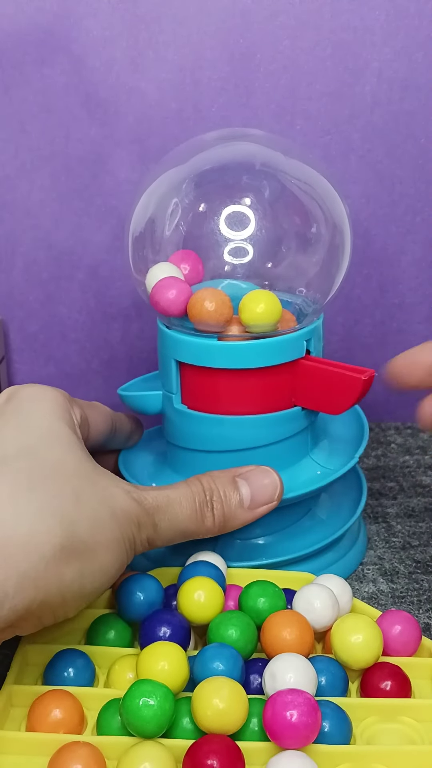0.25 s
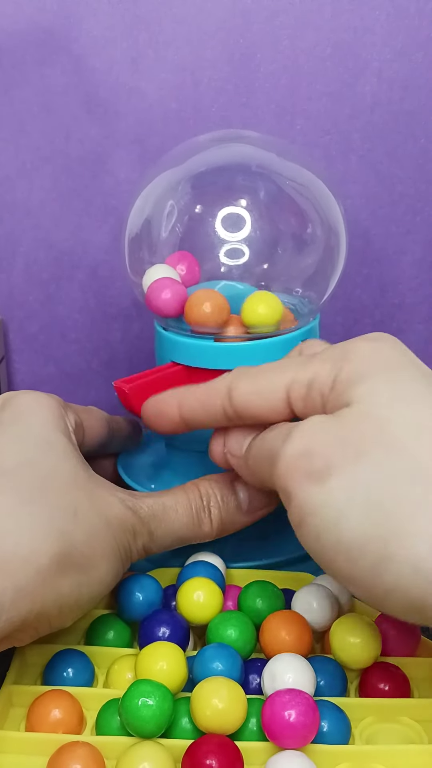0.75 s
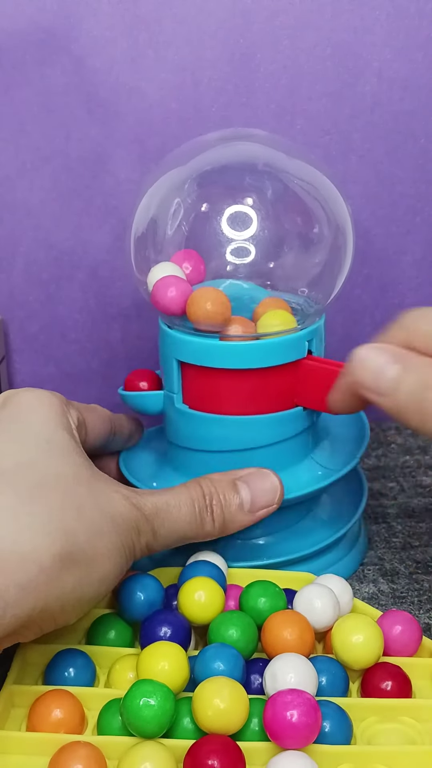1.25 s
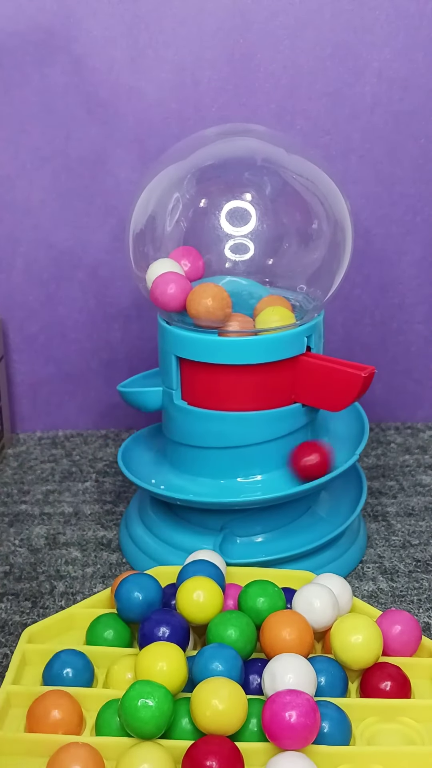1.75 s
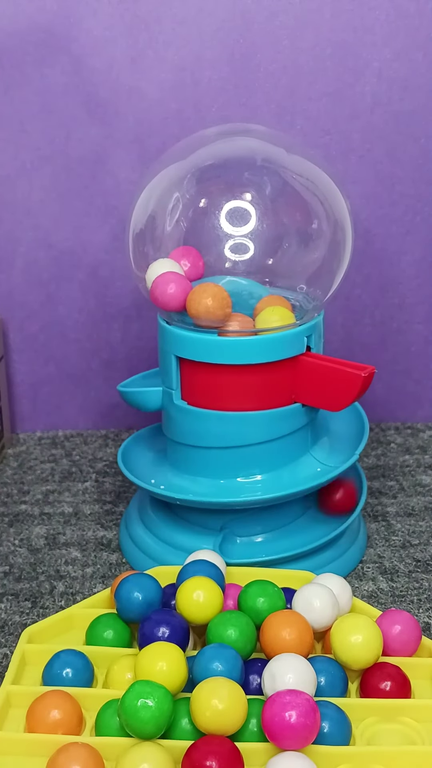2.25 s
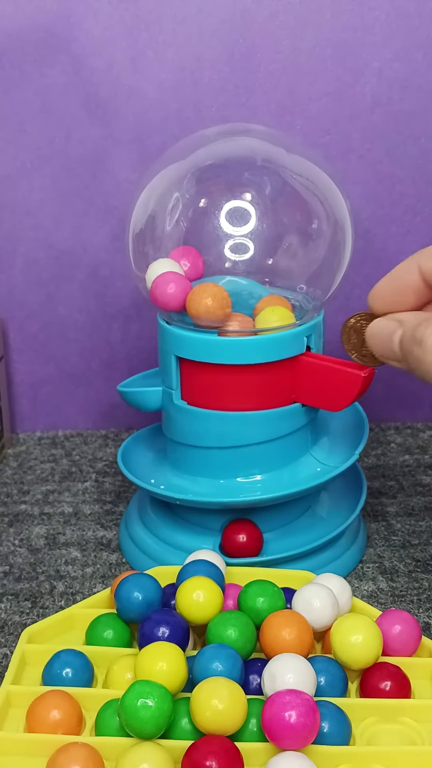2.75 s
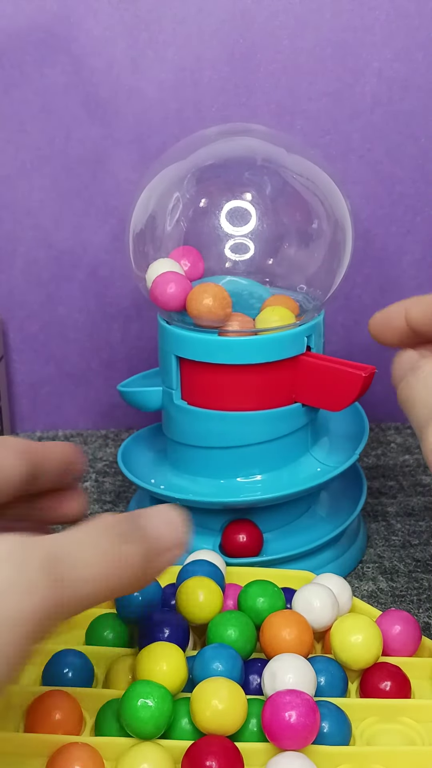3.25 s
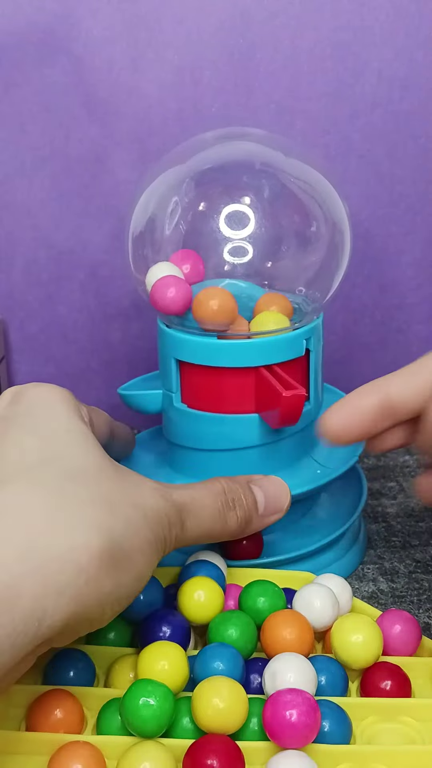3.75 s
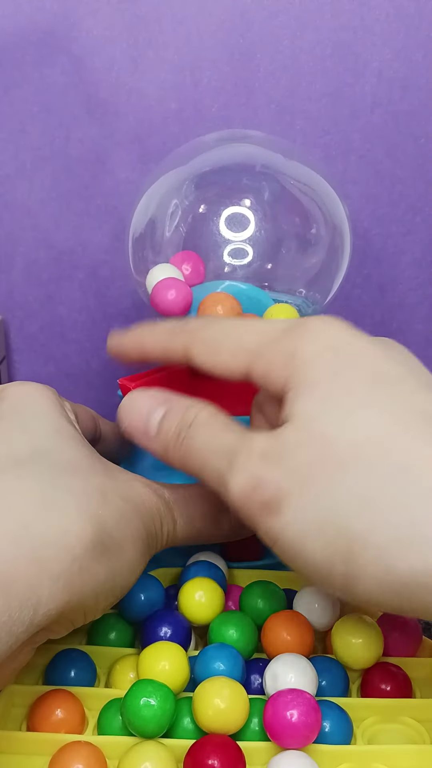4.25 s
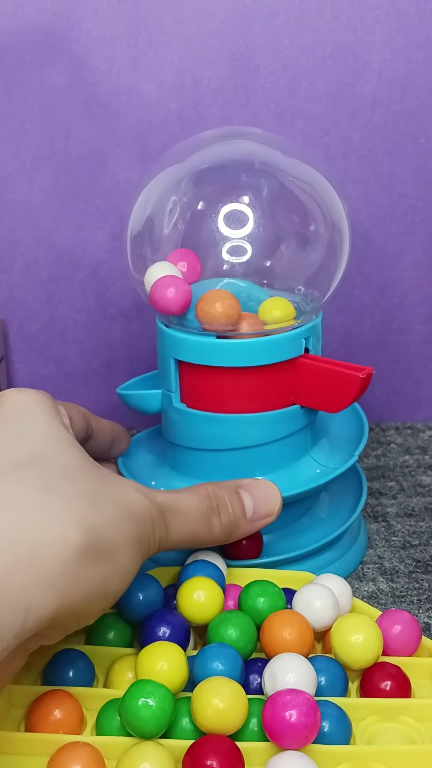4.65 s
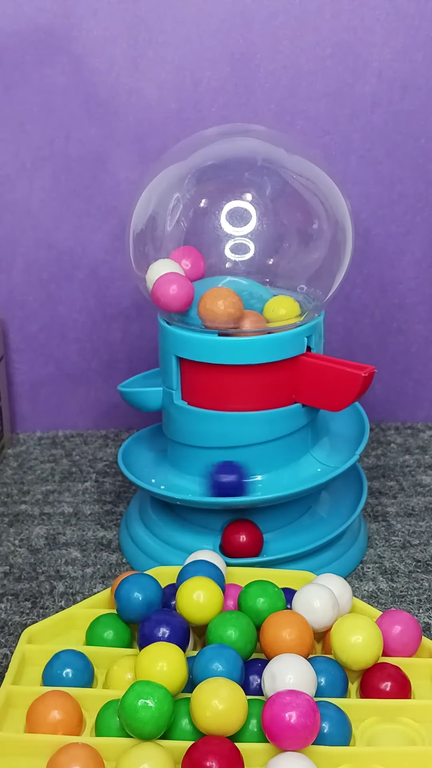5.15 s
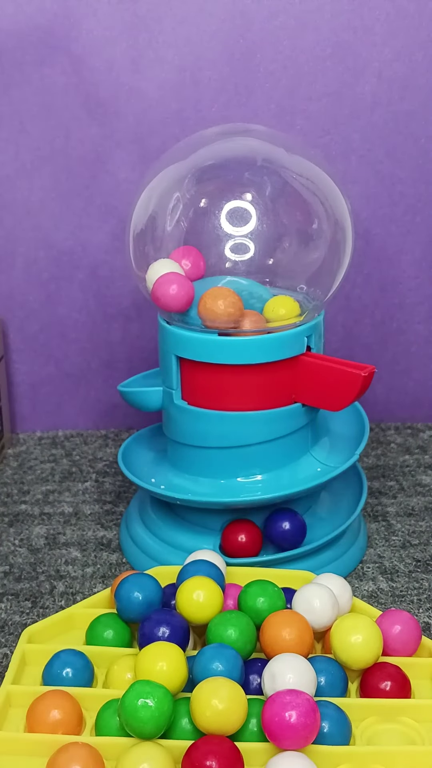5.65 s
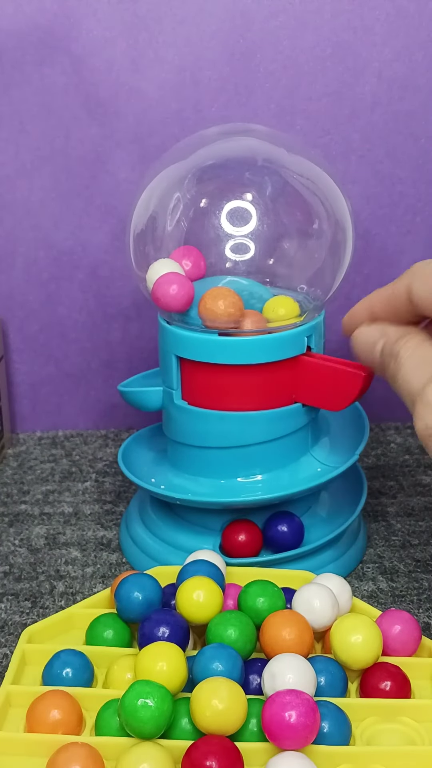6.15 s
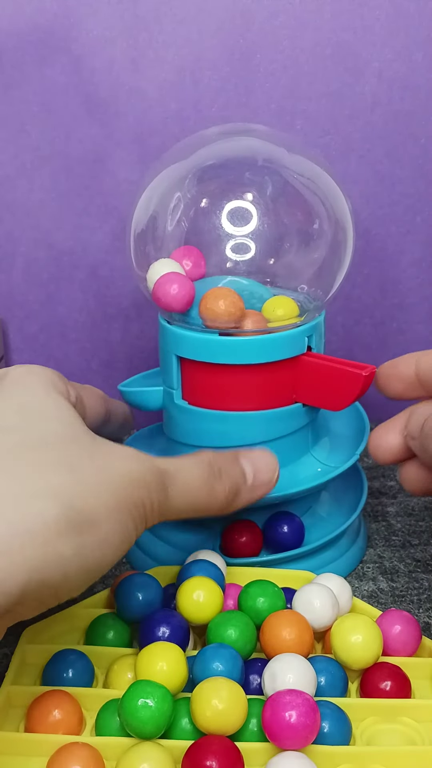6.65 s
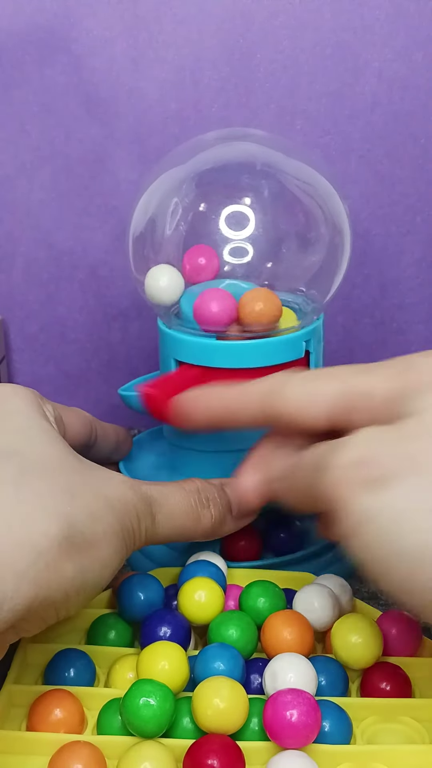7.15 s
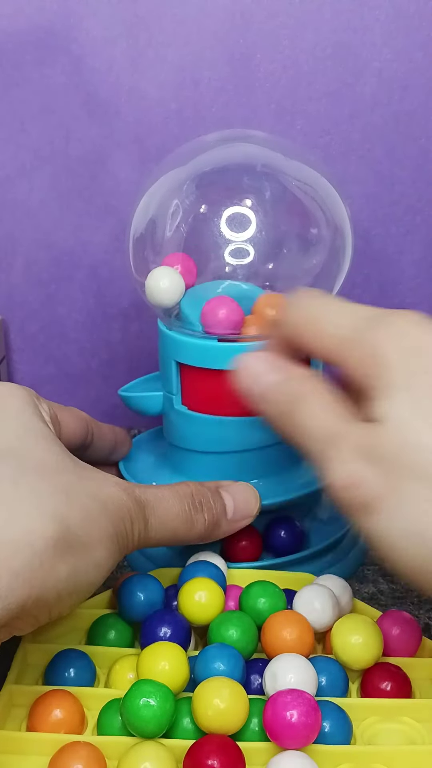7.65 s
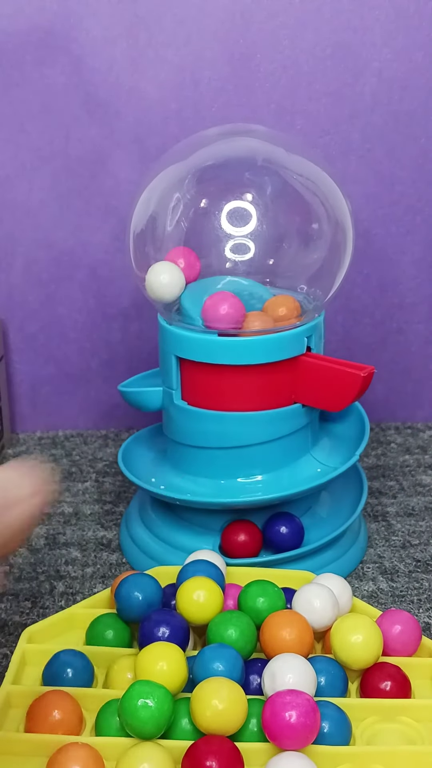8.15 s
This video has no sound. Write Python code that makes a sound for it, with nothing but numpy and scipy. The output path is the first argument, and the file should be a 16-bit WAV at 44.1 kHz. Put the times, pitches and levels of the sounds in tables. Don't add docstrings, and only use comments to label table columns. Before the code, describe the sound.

Three rounds of a plastic ball machine, heard closely in stereo: dry coin clicks, a hollow scraping lever swing with loud snapping stops and loose inner clatter, then a light ball hopping and rolling in uneven laps down a plastic ramp. The first two balls end with bright knocks; the third is still rolling at the end. The room is quiet, with short reflections, soft hiss and slight low bumps through the table.

```python
import sys
import numpy as np
from scipy import signal
from scipy.fft import rfft, irfft, next_fast_len
from scipy.io import wavfile
from scipy.ndimage import uniform_filter1d

SR = 44100
rng = np.random.default_rng(int(sys.argv[2]) if len(sys.argv) > 2 else 0)


def natural_amplitude(level_db):
    exponent = np.asarray(level_db, float) / 20
    return 10 ** exponent


def log_audio(samples):
    frames = np.atleast_2d(samples).T
    limited = np.clip(frames, -1, 1)
    pcm = np.round(limited * 32767).astype(np.int16)
    wavfile.write(sys.argv[1], SR, pcm)


N = 370881
T = np.arange(5000) / SR
LEAD = 110
SPOT_HZ = np.geomspace(1300, 4500, 10)


def evened(x):
    return x / np.sqrt(np.mean(x ** 2) + 1e-20)


def read(points, hz):
    f, value = np.transpose(points)
    return np.interp(np.log(hz + 1), np.log(f + 1), value)


def add(mix, s, sound):
    part = mix[:, round(s * SR):][:, :sound.shape[1]]
    part += sound[:, :part.shape[1]]


def coloured(x, points, share=1):
    n = x.shape[-1]
    size = next_fast_len(n)
    gain = natural_amplitude(share * read(points, np.fft.rfftfreq(size, 1 / SR)))
    return irfft(rfft(x, size) * gain, size)[..., :n]


# pitch_hz [Hz], level_db [dB per Hz]
ROOM_TONE = [(30, -14.5), (300, -31), (510, -29), (900, -39.5), (3200, -34), (6000, -41.5), (11000, -34.5),
             (15500, -43.5)]


def air():
    a, b, waver = rng.standard_normal((3, N))
    hum_db = -76.5 + 3.0 * evened(uniform_filter1d(waver, 2500))
    hum = natural_amplitude(hum_db) * np.sin(2 * np.pi * 63 * np.arange(N) / SR)
    hiss = evened(coloured(np.array([a, .5 * a + 1.9 * b]), ROOM_TONE))
    return natural_amplitude(-73) * hiss + hum


# pitch_hz [Hz], t60_s [s]
ROOM_DECAY = [(300, 0.22), (1000, 0.2), (3000, 0.15), (8000, 0.21), (15000, 0.02)]


def echo(x):
    taps = np.zeros((2, 16000))
    at = np.arange(300, 15960, 20) + rng.integers(0, 20, (2, 783))
    np.put_along_axis(taps, at, rng.choice([-1., 1.], at.shape), 1)
    hz, t, z = signal.stft(taps, SR, nperseg=256)
    same = np.exp(-(hz[:, None] / 800) ** 2)
    z[1] = same * z[0] + np.sqrt(1 - same ** 2) * z[1]
    decay = natural_amplitude(-60 * t / read(ROOM_DECAY, hz)[:, None])
    tail = signal.istft(z * decay, SR, nperseg=256)[1]
    return signal.oaconvolve(x[None], tail / np.linalg.norm(tail[0]), axes=1)[:, :N]


def room(x):
    turn = 2 * np.pi * 7 * np.arange(N) / SR
    mono = x.mean(0) * np.sqrt(2 / 3)
    return sum(echo(mono * np.cos(turn + k * np.pi / 3)) for k in range(3))


# start_s [s], hardest_s [s], end_s [s], pressure_db [dB], hollow_db [dB]
STROKES = [
    (0.618, 0.786, 1.03, -35.5, -14.5),
    (1.148, 1.217, 1.35, -38, -2.5),
    (3.628, 3.714, 3.82, -37, -4),
    (3.906, 4.132, 4.29, -31, -12.5),
    (4.408, 4.43, 4.52, -38, -6),
    (6.007, 6.033, 6.13, -62, -4.5),
    (6.718, 6.94, 7.02, -45, -0.5),
    (7.054, 7.308, 7.34, -41, -4.5),
    (7.411, 7.423, 7.85, -31, -12),
]


def stroke(start, top, end, db, hollow_db):
    swell = ((start, db - 14), (top, db), (end, db - 21))
    return [(s, d, d + hollow_db, d - 7) for s, d in swell]


# start_s [s], end_s [s], first_hollow_pass_s [s], level_db [dB], speed_gain [dB per s]
DESCENTS = [
    (1.349, 2.459, 1.58, -60, 14.5),
    (2.501, 2.734, 2.62, -84.5, -13),
    (4.522, 5.762, 4.3, -56, 10),
    (7.85, 8.412, 7.56, -56.5, 6),
]


def descent(start, end, passes, db, db_per_s):
    lap_s, edge = .6, 2.6
    near = np.array([-3, 1.5, -12, 1900])
    far = np.array([0.5, -12, -6, 3100])
    s = np.linspace(start, end, 40)[:, None]
    away = .5 - .5 * np.tanh(edge * np.cos(2 * np.pi * (s - passes) / lap_s))
    lap = near + away * (far - near)
    speed_db = db_per_s * (s - start) * [1, .35, 1]
    return np.column_stack([s, lap[:, :3] + db + speed_db, lap[:, 3]])


# pitch_hz [Hz], level_db [dB per Hz]
TABLE_RUMBLE = [(40, -13.5), (70, -3.5), (155, 1), (230, -9.5), (400, -40.5)]


def handling():
    t = np.arange(N) / SR
    pressure = np.zeros(N)
    for shape, rows, gain_db in ((stroke, STROKES, 0), (descent, DESCENTS, -7.0)):
        for row in rows:
            s, db = np.transpose(shape(*row))[:2]
            pressure += natural_amplitude(np.interp(t, s, 0.62 * db + gain_db, -200, -200))
    rumble, lumps = rng.standard_normal((2, N))
    lumps_db = -39 + 3.3 * evened(uniform_filter1d(lumps, 1200))
    return evened(coloured(rumble, TABLE_RUMBLE)) * natural_amplitude(lumps_db) * uniform_filter1d(pressure, 600)


def ring(modes, spread_db, detune, twist):
    hz, db, t60 = np.transpose(modes)[:, :, None]
    spot, tune, left, right = rng.standard_normal((4, len(hz), 1))
    t = T[:round(t60.max() * SR) + 200]
    body = natural_amplitude(db + spread_db * spot - 60 * t / t60)
    turn = 2 * np.pi * hz * (1 + detune * tune) * t
    pair = np.array([(body * np.sin(turn + twist * port)).sum(0) for port in (left, right)])
    padded = np.pad(pair, ((0, 0), (0, len(T) - len(t))))
    return padded / np.sqrt(np.mean(pair[:, :200] ** 2))


# start_s [s], level_db [dB], pitch_hz [Hz], t60_s [s]
COINS = [(0.357, -26.5, 12750, 0.15), (0.801, -31.5, 12800, 0.14), (0.901, -36.5, 12550, 0.22),
         (.945, -50, 13000, 0.15), (4.121, -37.5, 13100, 0.6), (4.124, -34, 12160, 0.14),
         (4.223, -31.5, 13400, 0.12), (4.228, -41, 12300, 0.14), (4.997, -41.5, 13000, 0.12),
         (5.0, -45.5, 11600, 0.16), (5.188, -56, 12500, 0.079), (5.258, -40, 12900, 0.23),
         (5.283, -45, 11700, 0.17), (5.292, -40, 12900, 0.13), (7.411, -31.5, 12500, 0.19),
         (7.415, -34, 13500, 0.11), (7.469, -42, 14000, 0.13), (7.488, -33, 12840, 0.23),
         (7.532, -36.5, 12770, 0.068)]


def coins():
    out = np.zeros((2, N))
    for s, db, hz, t60 in COINS:
        shake, buzz = rng.standard_normal((2, len(T)))
        slow = .5 * evened(uniform_filter1d(shake, 150))
        fast = .45 * evened(uniform_filter1d(buzz, 14))
        split = [(hz, 0, t60), (hz * 1.006, -5, t60)]
        add(out, s, natural_amplitude(db) * (1 + slow + fast) * ring(split, spread_db=1.5, detune=.001, twist=1.2))
    return out


# pitch_hz [Hz], level_db [dB]
SHELL = [(630, -6.5), (850, 6), (1020, 3), (1500, -7), (1900, 3), (2085, 13.5), (2200, -7), (2420, 2.5),
         (2900, 10), (3300, 15.5), (3600, 18.5), (3960, 13.5), (4440, 10.5), (4880, -4.5)]
# pitch_hz [Hz], level_db [dB]
RAMP = [(790, -6.5), (990, 3.5), (1520, -12), (1680, 0.5), (1850, 5.5), (2060, 8.5), (2250, 9), (2600, 4),
        (2950, 12), (3300, 14), (3650, 12), (4200, 7), (4800, -8)]
# pitch_hz [Hz], level_db [dB], t60_s [s]
HOLLOW = [(353, -13.5, 0.03), (454.8, 3, 0.057), (478, 6.5, 0.056), (517.5, 1.5, 0.072),
          (602.7, -3.5, 0.06)]
# pitch_hz [Hz], level_db [dB per Hz]
TICK = [(2650, -28.5), (4500, -1.5), (5510, -11), (9160, -11.5), (11400, -11.5), (13100, -11.5),
        (15400, -28), (16000, -33)]


def contact(spot_hz, chatter_db, body, chatter_s=0.099, ring_s=.02):
    modes = []
    for hz, db in [*body, (spot_hz, 12.0)]:
        focus_db = -6.5 * np.log2(hz / spot_hz) ** 2
        modes.append((hz, db + focus_db, ring_s * np.sqrt(1000 / hz)))
    crack = natural_amplitude(2.5) * np.sin(2 * np.pi * spot_hz * T) * np.exp(-(T * spot_hz / 1.4) ** 2)
    shell = ring(modes, spread_db=2.5, detune=.015, twist=.75) * (1 - np.exp(-T / 0.0002))
    thin = signal.butter(2, 600, "high", fs=SR)
    shell = signal.lfilter(*thin, crack + shell)
    hollow = ring(HOLLOW, spread_db=2.5, detune=.03, twist=.3) * (1 - np.exp(-T / .007))

    a, b, loose = rng.standard_normal((3, len(T)))
    since = T - LEAD / SR
    fade = np.maximum(since / chatter_s, -since / 0.028)
    force = loose ** 3 * natural_amplitude(chatter_db - 60 * fade)
    force[LEAD] = 1
    flash = natural_amplitude(-60 * T / .006) * (1 - np.exp(-T / .0004))
    parts = [shell, hollow, [flash ** 2] * 2]
    forces = np.array([force, force, force ** 2])[:, None]
    shell, hollow, power = signal.fftconvolve(parts, forces, axes=2)[..., :len(T)]
    hiss = coloured(np.array([a, .5 * a + 1.41 * b]), TICK)
    return np.array([shell, hollow, evened(hiss) * np.sqrt(np.abs(power))])


def patches(body, ring_s):
    spots = np.array([contact(hz, -56.0, body, ring_s=ring_s)[:, :, :2500] for hz in SPOT_HZ])
    return spots / np.sqrt((spots ** 2).mean(2, keepdims=True).sum(3, keepdims=True))


def rattle(rows, clicks, spot_hz, spots):
    s, *levels = np.transpose(rows)[:4]
    t = s[0] + np.arange(len(clicks)) / SR
    patch = np.abs(np.log(spot_hz[:, None] / SPOT_HZ)).argmin(1)
    clicks = evened(clicks) * signal.windows.tukey(len(t), .08)
    force = np.array([natural_amplitude(np.interp(t, s, db)) * clicks for db in levels])
    size = next_fast_len(len(t) + spots.shape[-1])
    spectrum = 0
    for k, spot in enumerate(spots):
        hits = rfft(force * (patch == k), size)
        spectrum = spectrum + (hits[:, None] * rfft(spot, size)).sum(0)
    return s[0], irfft(spectrum, size)


def scrape(rows, spots, per_s=2500, size_db=3.0):
    chance, size, place = rng.random((3, round((rows[-1][0] - rows[0][0]) * SR)))
    sign = np.sign(place % .02 - .01)
    slips = natural_amplitude(-size_db * np.log(size + 0.0098)) * (chance < per_s / SR) * sign
    return rattle(rows, slips, 1300 * 3.1 ** place, spots)


def roll(rows, spots, hops_per_s=80, grit_per_s=700, grit_db=-6.0, size_db=4.0, swell_db=2.5):
    chance, size, place = rng.random((3, round((rows[-1][0] - rows[0][0]) * SR)))
    pace = hops_per_s * (1 + 0.41 * evened(uniform_filter1d(chance - .5, 500)))
    landings = np.diff(np.floor(np.cumsum(np.abs(pace)) / SR), prepend=0)
    grit = natural_amplitude(grit_db) * (chance < grit_per_s / SR)
    pressure_db = swell_db * evened(uniform_filter1d(size - .5, 2500))
    clicks = natural_amplitude(pressure_db - size_db * np.log(size + .3)) * (landings + grit)
    s, *_, hz = np.transpose(rows)
    wander = 1.12 ** evened(uniform_filter1d(place - .5, 3000))
    lap_hz = np.interp(s[0] + np.arange(len(size)) / SR, s, hz)
    return rattle(rows, clicks, lap_hz * wander * 1.15 ** (place - .5), spots)


def moving_parts():
    out = np.zeros((2, N))
    kinds = ((scrape, stroke, STROKES, SHELL, .012), (roll, descent, DESCENTS, RAMP, .02))
    for play, shape, rows, body, ring_s in kinds:
        spots = patches(body, ring_s)
        for row in rows:
            add(out, *play(shape(*row), spots))
    return out


# start_s [s], peak_db [dB], pitch_hz [Hz]
FIRST_HOPS = [(1.4549, -47, 1980), (1.4736, -55, 2110), (1.4832, -51, 2110), (1.512, -56, 2070),
              (1.518, -40, 2150), (1.5302, -42, 1720), (1.6286, -52, 2150), (1.7185, -54, 1460),
              (1.738, -56, 3230), (1.772, -30, 3140), (1.7839, -34, 2150), (1.8027, -30, 2200),
              (1.8137, -30, 3570), (1.829, -35, 3660), (1.8647, -44, 3360), (1.8756, -50, 3320),
              (1.8887, -33, 1510), (1.8988, -37, 4010), (1.914, -41, 3660), (1.9231, -33, 2240),
              (1.9526, -34, 1680), (1.9952, -29.5, 3190), (2.0171, -29, 2150), (2.0287, -31, 2200),
              (2.0439, -25, 2280), (2.0691, -27, 2330), (2.0966, -20, 3230), (2.1092, -21, 2330),
              (2.1453, -36, 1680), (2.1525, -42, 2280), (2.1639, -36, 2280), (2.1732, -26, 2280),
              (2.1965, -46.5, 2670), (2.2217, -23, 1770), (2.2404, -35, 2200), (2.2542, -18, 3230),
              (2.2701, -29, 3230), (2.2806, -32, 2200), (2.3034, -28, 2240), (2.3259, -41, 1680),
              (2.3376, -29, 1720), (2.4387, -22.5, 1590), (2.4465, -25.5, 1850), (2.5261, -41, 2020),
              (2.5602, -48, 1590), (2.5824, -47, 1810), (2.6197, -39, 1810), (2.648, -44.5, 1680),
              (2.6627, -51.5, 1810), (2.6742, -46, 1810), (2.6825, -46.5, 1810), (2.7071, -56.5, 1770)]
SECOND_HOPS = [(4.6647, -35, 2070), (4.6824, -47, 2150), (4.7181, -50, 2070), (4.725, -46, 1980),
               (4.7377, -28.5, 2020), (4.795, -46, 1640), (4.8039, -49, 1640), (4.8303, -42, 1770),
               (4.851, -44, 1680), (4.8901, -49, 1640), (4.9446, -35, 2150), (4.9551, -35, 2020),
               (4.971, -42, 2200), (4.9846, -42, 2110), (5.0267, -42, 2200), (5.0463, -29, 2070),
               (5.0758, -36, 1720), (5.1019, -36, 3450), (5.1243, -38, 1770), (5.15, -48, 3060),
               (5.159, -44, 1810), (5.1997, -45, 3270), (5.2192, -39, 3660), (5.2363, -33, 1590),
               (5.246, -31, 3270), (5.2594, -35, 1550), (5.2696, -38, 3010), (5.2827, -32, 3010),
               (5.3213, -35, 2580), (5.3381, -28, 2580), (5.375, -42, 2280), (5.386, -34, 2330),
               (5.4542, -34, 1850), (5.4835, -35, 1770), (5.4984, -32, 2280), (5.5115, -26, 3320),
               (5.5276, -32, 1770), (5.5519, -39, 1980), (5.5631, -28, 1770), (5.5704, -25, 3320),
               (5.5903, -29, 2150), (5.5967, -33, 2150), (5.6104, -42, 2200), (5.62, -32, 2280),
               (5.6322, -31, 1680), (5.6483, -32, 2280), (5.707, -35, 1850), (5.7259, -25, 1770),
               (5.7386, -18.5, 1940), (5.7454, -26.5, 1770)]
THIRD_HOPS = [(7.8815, -32, 2370), (7.913, -34, 2020), (7.9636, -38, 3920), (7.985, -33.5, 2110),
              (8.0025, -39, 2020), (8.1427, -43, 2110), (8.1713, -44, 1980), (8.187, -51.5, 2020),
              (8.254, -33, 3230), (8.308, -32, 3660), (8.319, -41, 2670), (8.326, -40, 1720),
              (8.3369, -47, 1680), (8.3516, -46, 1810), (8.3713, -27, 2970), (8.3962, -26, 3230)]
# start_s [s], peak_db [dB], pitch_hz [Hz]
CLICKS = [(0.3471, -11, 2000), (.4074, -16, 1845), (.4883, -34.5, 1870), (.5866, -49.5, 1900),
          (.632, -13, 1830), (1.0952, -30, 1905), (1.1474, -20, 3390), (1.1845, -22, 3580),
          (1.2949, -18, 2140), (3.9384, -10.5, 1900), (4.0957, -28, 2060), (6.956, -13, 4715),
          (6.9944, -20, 3420), (7.5976, -35, 3660), (7.6883, -16, 1940), (5.3, -20.5, 2056),
          (5.778, -38, 1980), (3.9914, -27, 2300), (2.9553, -39.5, 4310), (3.1373, -37, 1590),
          (4.1295, -19, 1900), (1.1249, -34, 1890), (4.3627, -33, 1890), (4.5793, -38, 3320),
          (7.7845, -21, 4600), (6.0163, -56, 2100), (6.0321, -52, 2070), (6.0751, -56, 2020),
          (.43, -26.5, 1880), (.447, -30.5, 1870), (7.3578, -11, 2100), (2.3812, -15, 3300),
          (3.1, -24, 3500), (.502, -40, 1880), (1.06, -41, 1950),
          (0.7824, -25, 2040), (0.8014, -22, 1780), (0.8114, -20, 2010), (0.8907, -23, 1930),
           (1.2142, -28, 3420), (3.1626, -20, 2090), (3.6859, -14, 1880), (3.7244, -25, 1820),
           (3.7813, -38, 1900), (3.9143, -27, 4270), (3.9669, -26, 1850), (4.1114, -24, 1910),
           (4.1525, -23, 2070), (4.1664, -27, 2160), (4.1924, -23, 1770), (6.1644, -23, 2060),
           (6.3607, -52.5, 2290), (6.7438, -21, 3950), (6.8984, -23, 1850), (7.4344, -10.5, 2070),
           (7.4514, -26, 1760), (7.4895, -15, 2070), (7.5085, -19, 2010), (7.7332, -21, 2070),
           (7.7447, -29, 3440)]


def hops():
    out = np.zeros((2, N))
    balls = [*FIRST_HOPS, *SECOND_HOPS, *THIRD_HOPS]
    lever = CLICKS
    for rows, body, ring_s, tick_db in ((balls, RAMP, 0.02, -11.0), (lever, SHELL, 0.014, -9.0)):
        part_gain = natural_amplitude([0, -10.0, tick_db])[:, None, None]
        spots = (patches(body, ring_s) * part_gain).sum(1)[..., LEAD:]
        at = np.arange(spots.shape[-1])
        for s, db, spot_hz in rows:
            k = np.abs(np.log(spot_hz / SPOT_HZ)).argmin()
            stretched = at * spot_hz / SPOT_HZ[k]
            click = np.array([np.interp(stretched, at, port) for port in spots[k]])
            add(out, s, natural_amplitude(db + 1) * click / np.abs(click).max())
    return out


# pitch_hz [Hz], level_db [dB], t60_s [s]
THUMP = [(151.5, -2.5, 0.1), (110, -7.5, 0.087), (66, -2, 0.073)]
# start_s [s], peak_db [dB], pitch_hz [Hz], tick_db [dB]
SLACK = [(.3555, -16, 1910, -6.5), (.624, -33, 1870, -7), (.7888, -26, 2000, -10),
         (1.041, -40.5, 2190, -16.5), (1.268, -31, 2044, -15), (2.8332, -47, 3480, -15.5),
         (2.9312, -46, 3630, -21), (3.6386, -26, 3610, -8.5), (3.911, -28, 4180, -6),
         (4.3116, -33, 3460, -7.5), (4.4025, -28.5, 2080, -8), (4.4398, -26.5, 1990, -10.5),
         (6.1191, -64, 3450, -4), (6.1358, -32, 3720, -13), (6.7217, -34, 2160, -12.5),
         (6.8223, -41, 3990, -11.5), (7.1138, -39, 4970, -4.5)]
# start_s [s], peak_db [dB], pitch_hz [Hz], tick_db [dB], extra_hollow_db [dB]
BUMPS = [(.3077, -22, 3810, -1.5, -1.5), (.377, -17, 1880, -3.5, -3.5), (.8365, -26.5, 3260, -11.5, -1.5),
         (1.1591, -27.5, 2180, -12.5, -2.5), (1.2221, -24.5, 3260, -17, -1),
         (2.9612, -19.5, 3640, -10, -4.5), (3.5322, -36, 4120, -14.5, 5), (3.631, -40.5, 3470, -18, 10),
         (4.3894, -33, 3580, -19, 6.5), (4.4578, -20, 1965, -10.5, -3.5), (4.8187, -43, 1730, -7.5, -1),
         (6.2642, -29, 2100, -23, -8), (6.9345, -20, 3750, -7.5, -3), (7.0488, -30, 1940, -6, -2.5),
         (7.1417, -24.5, 1840, -20, -1), (7.568, -22, 3650, -6.5, 2), (7.658, -22.5, 3613, -12, 0),
         (8.0576, -43.5, 1660, -14, 3)]
# start_s [s], peak_db [dB], pitch_hz [Hz], tick_db [dB], extra_hollow_db [dB]
STOPS = [(.6892, -6.5, 2260, -8.5, 2), (.7133, -14, 2060, -9.5, -6), (3.6576, -14, 2100, -7.5, -4),
         (3.6657, -10, 2070, -3, 0), (4.0013, -7, 2970, -4.5, -4.5), (6.8394, -9.5, 4380, -9, 0.5),
         (6.8579, -10, 3500, -8.5, 2), (7.205, -4.5, 4300, -7.5, 0.5), (7.3576, -14, 2060, -11.5, -5),
         (7.4108, -26.5, 2200, -6, 0), (7.4228, -17, 2080, -10, 1), (7.4638, -19, 3400, -11.5, 2.5),
         (7.7074, -20, 2300, -14, -5), (7.7776, -24.5, 2300, -18, 0), (7.716, -18, 2170, -13, -5),
         (6.874, -17.5, 1950, -13, 7), (.381, -13.5, 3700, -9, -3), (6.861, -13.5, 3400, -4.5, -1),
         (7.2068, -19, 810, -25, -4), (6.923, -28.5, 1000, -24, -4)]
# start_s [s], peak_db [dB], pitch_hz [Hz], tick_db [dB]
DROPS = [(.0629, -26, 2600, -17), (.109, -14, 2603, -16), (.756, -24, 2160, -16),
         (1.1984, -23.5, 2010, -16), (2.2059, -35, 2276, -1.5), (3.1481, -15, 2196, -11.5),
         (3.8536, -34, 4150, -17.5), (4.0385, -13.5, 1900, -12.5), (4.12, -19.5, 1940, -12),
         (4.5223, -22.5, 2040, -17.5), (4.5974, -28, 2034, -14), (6.2276, -13, 2180, -9),
         (7.337, -31.5, 4180, -14), (7.7648, -27.5, 1630, -36), (7.8538, -30, 2020, -16.5),
         (8.2314, -37, 3660, -15), (8.3581, -35, 3460, -35)]
# start_s [s], peak_db [dB], pitch_hz [Hz], tick_db [dB]
RIMS = [(.898, -20.5, 2400, -9), (.9457, -27.5, 3580, -5.5), (1.3533, -31, 4200, -13.5),
        (1.7589, -43, 3210, 2), (2.382, -14.5, 1970, -20.5), (2.4243, -26.5, 1600, -15),
        (2.604, -35.5, 1750, -30), (2.9905, -24.5, 2180, -12), (3.0998, -27, 2270, -22),
        (3.8095, -34.5, 1900, -29), (4.0851, -16.5, 1970, -13.5), (4.4858, -22, 1970, -18),
        (5.0931, -38.5, 3340, -19), (5.1861, -44, 3250, -15), (5.6411, -27.5, 2180, -36),
        (5.6686, -19, 2040, -6.5), (6.1886, -19.5, 2050, -22), (6.2776, -19, 2100, -14.5),
        (8.293, -36, 3330, -9)]
# rows, modes struck, hollow_db [dB], chatter_db [dB]
KINDS = [(SLACK, SHELL, -10, -30), (BUMPS, SHELL, -4.5, -34), (STOPS, SHELL, -12, -35.5),
         (DROPS, SHELL, -17.5, -41.5), (RIMS, RAMP, -36, -41.5)]


def knocks():
    out = np.zeros((2, N))
    for rows, body, hollow_db, chatter_db in KINDS:
        for s, db, spot_hz, tick_db, *extra_db in rows:
            loose_db = chatter_db - 0.2 * (db + 23)
            shell, hollow, tick = contact(spot_hz, loose_db, body)
            thump = ring(THUMP, spread_db=4.5, detune=0.089, twist=0.18) * (1 - np.exp(-T / 0.011))
            low = natural_amplitude(hollow_db + sum(extra_db) + 6.5) * hollow + natural_amplitude(0.8 * hollow_db - 12.5) * thump
            add(out, s - LEAD / SR, natural_amplitude(db - 4.0) * (shell + low + natural_amplitude(tick_db + 16.5) * tick))
    return out


def scene():
    toy = knocks() + hops() + moving_parts() + coins() + handling()
    return toy + natural_amplitude(-10.5) * room(toy) + air()


# pitch_hz [Hz], left_minus_right_db [dB]
PORTS = [(100, 6), (600, -2.5), (1500, 0.5), (2800, -7), (6000, 4), (12000, 13)]


def microphone_ports(dry):
    left, right = coloured(dry, PORTS, np.array([[.5], [-.5]]))
    late = np.roll(right, 6)
    rounded = .85 * np.tanh(np.array([left, late]) / .85)
    top = signal.firwin(255, 15700, window=("kaiser", 8), fs=SR)
    return signal.oaconvolve(rounded, top[None], "same", axes=1)


def top_cut(x):
    return signal.sosfilt(signal.butter(12, 16480, fs=SR, output="sos"), x)


def record(dry):
    mix = microphone_ports(dry)
    return top_cut(mix)


dry = scene()
out = record(dry)
log_audio(out)
```